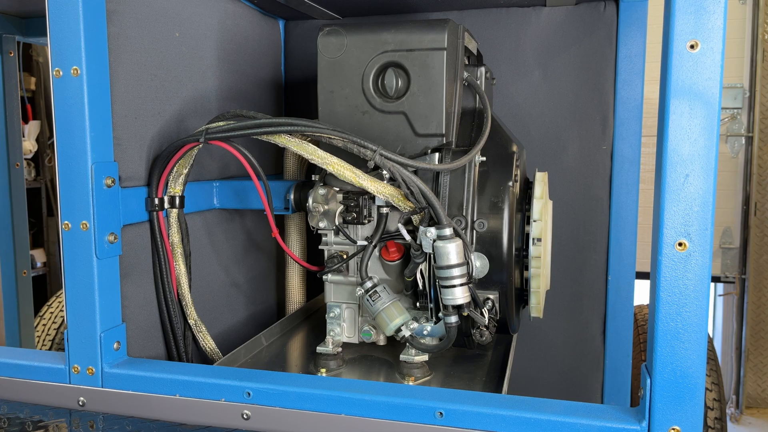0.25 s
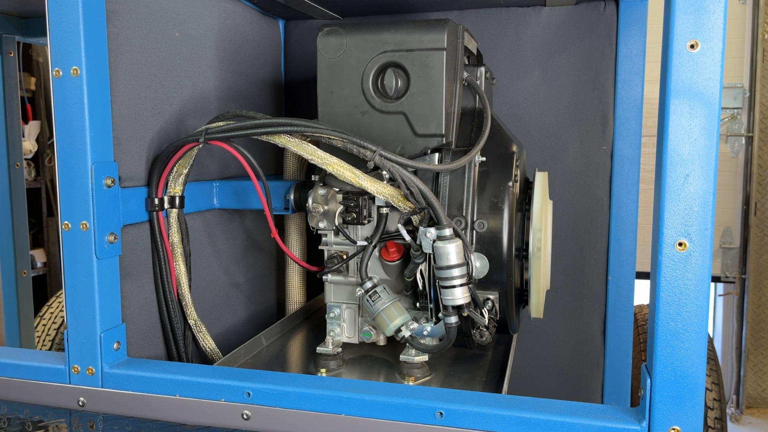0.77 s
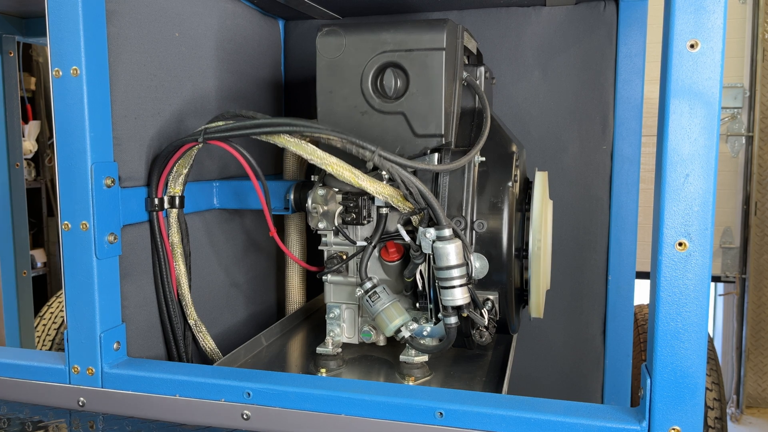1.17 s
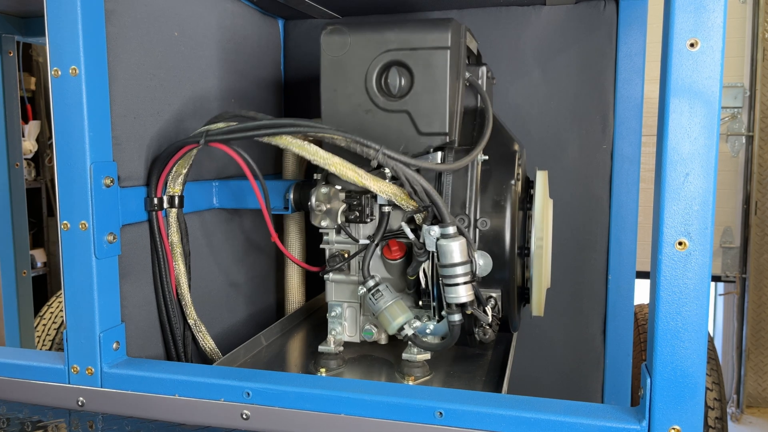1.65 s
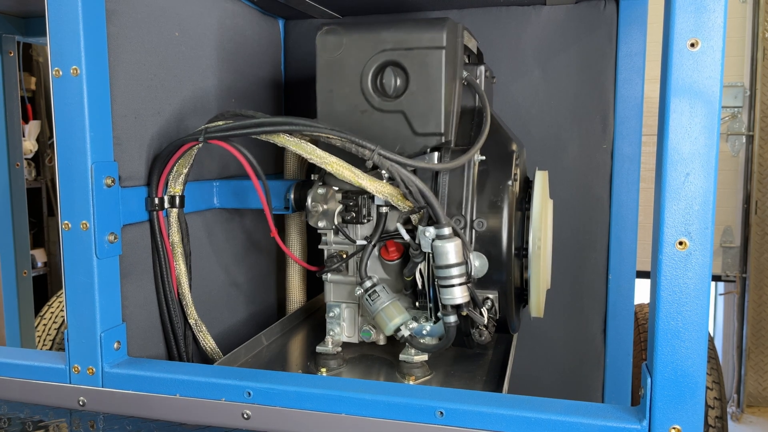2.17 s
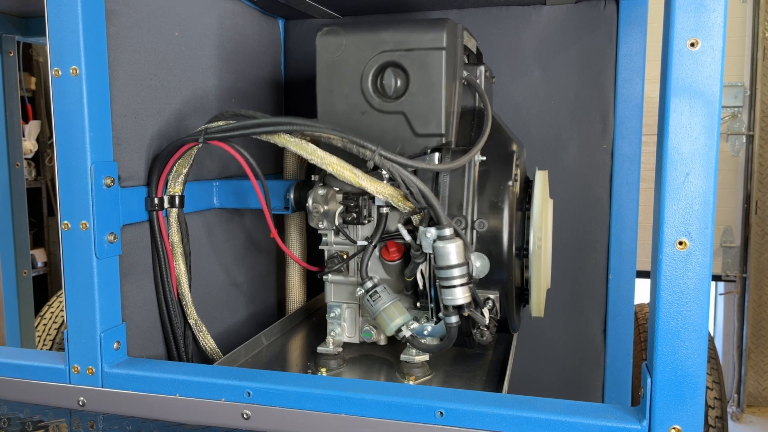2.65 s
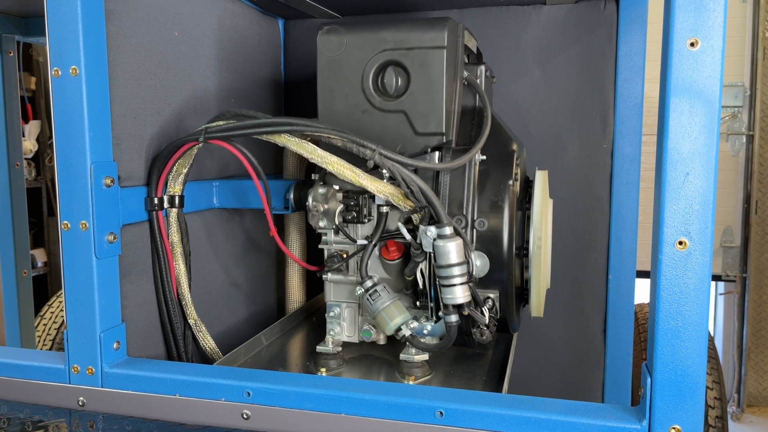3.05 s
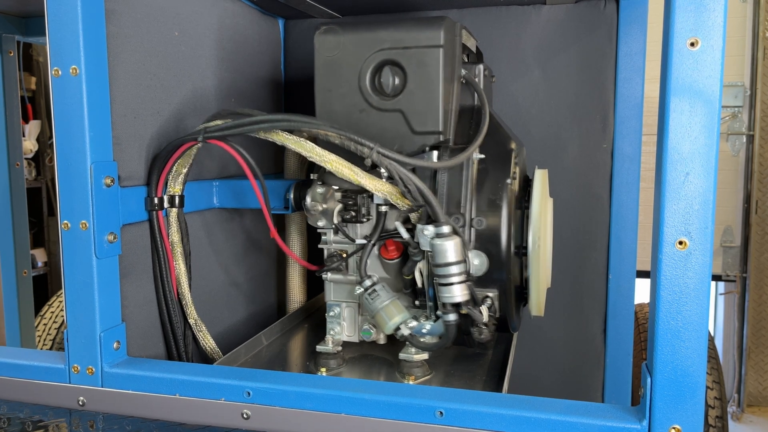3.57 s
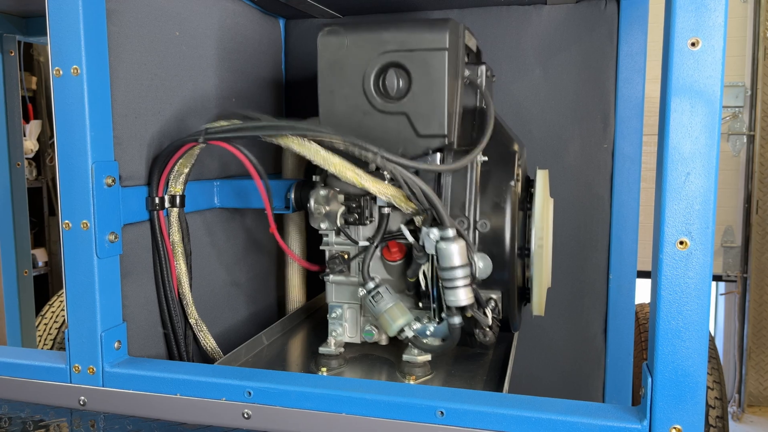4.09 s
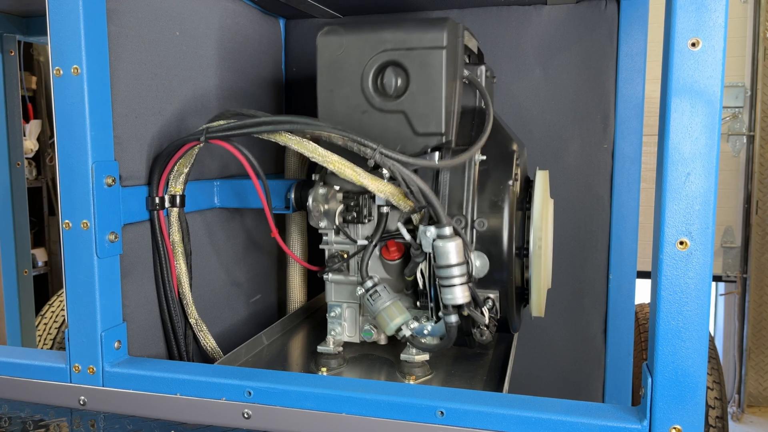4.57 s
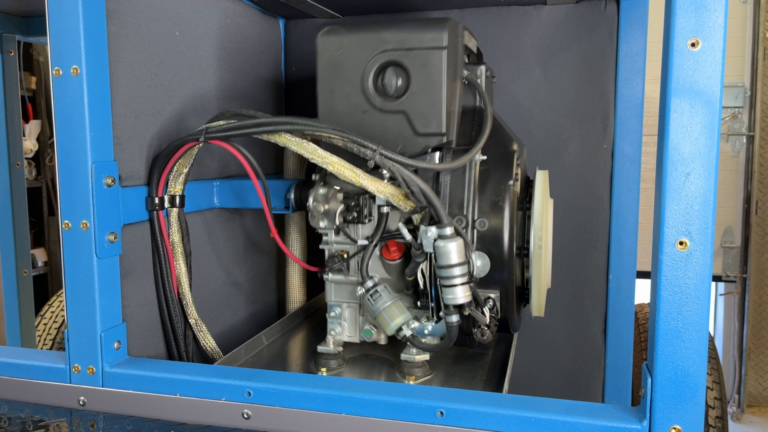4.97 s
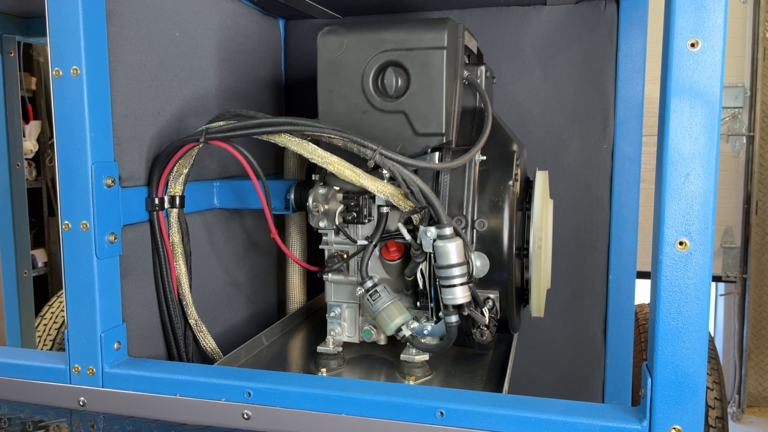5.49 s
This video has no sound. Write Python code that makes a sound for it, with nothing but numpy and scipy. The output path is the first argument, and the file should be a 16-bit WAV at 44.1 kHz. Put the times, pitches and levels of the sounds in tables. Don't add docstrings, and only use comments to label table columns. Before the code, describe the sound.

Close, dry stereo pickup of a small single-cylinder diesel in a metal frame, in a quiet yard. Near silence, then a metallic solenoid clack and a rising, labouring starter whine for about a second. Combustion catches with hard knocks, idles near ten per second with ticking valves, then suddenly knocks harder and accelerates into a steady low throb with mechanical clatter.

```python
import sys
import numpy as np
from scipy import signal
from scipy.fft import rfft, irfft, next_fast_len
from scipy.io import wavfile
from scipy.ndimage import uniform_filter1d

SR = 44100
rng = np.random.default_rng(int(sys.argv[2]) if len(sys.argv) > 2 else 0)


def amplitude_ratio(level_db):
    exponent = np.asarray(level_db, float) / 20
    return 10 ** exponent


def to_wav(sig):
    pcm = np.clip(np.atleast_2d(sig), -1, 1) * 32767
    pcm = np.round(pcm).astype(np.int16)
    wavfile.write(sys.argv[1], SR, pcm.T)


N = 253001
T = np.arange(N) / SR
IDLE_KNOCK_DB = -24

# t/s, level/dB
STARTER_EFFORT = [
    (0.61, -59),
    (0.635, -49),
    (0.7, -37),
    (0.93, -36.5),
    (1.01, -37),
    (1.27, -35.5),
    (1.38, -42.5),
    (1.485, -36.5),
    (1.56, -61),
]
# t/s, knock level/dB, brightness/dB
EARLY_FIRINGS = [(0.944, -25.5, -2), (1.238, -17.5, 6), (1.405, -18, -7), (1.54, -14.5, -4),
                 (1.65, -18.5, 2), (1.75, -17.5, 0), (1.846, -18.5, 1), (1.941, -24.5, 2),
                 (2.038, -26, 3.5), (2.138, -21.5, 2), (2.236, -22, 0), (2.335, -21.5, 1),
                 (2.439, -23.5, 3), (2.542, -22.5, 3), (2.649, -22.5, 0.5), (2.753, -22, 1.5),
                 (2.863, -22, 0), (2.974, -21.5, 1.5), (3.082, -21.5, -2), (3.192, -22, 1),
                 (3.304, -22, -1), (3.414, -23, 2), (3.5295, -13.5, 3), (3.63, -12.5, 2), (3.723, -13, 3.5),
                 (3.805, -14, 4.5), (3.883, -14, 7.5)]
# t/s, firing rate/Hz
RUN_UP_SPEED = [(3.883, 13.01), (4.2, 17.41), (4.5, 19.09), (4.8, 21.29), (5, 23.3), (5.25, 24.88),
                (5.75, 25.42)]
# f/Hz, level/dB, t60/s
HEAD_MODES = [(2745, -4, .035), (3350, 0, .04), (3700, -1, .03), (4190, -3, .028), (4726, -6, .03),
              (5756, -11, .025), (6400, -14, .02), (8300, -20, .015), (10600, -19, .015),
              (12500, -21, .015)]
# f/Hz, level/dB
CLATTER_SPECTRUM = [(200, 0.5), (400, 1.5), (700, -1), (1000, -1.5), (1500, -3), (2300, -3), (2900, -7.5),
                    (3500, -6), (5000, -12.5), (7000, -19), (9000, -21.5)]


def read(points, hz):
    f, value = np.transpose(points)
    return np.interp(np.log(hz + 1), np.log(f + 1), value)


def curves(rows):
    s, *columns = np.transpose(rows)
    return [np.interp(T, s, c) for c in columns]


def evened(x):
    return x / np.sqrt(np.mean(x ** 2) + 1e-20)


def filtered(x, hz, kind="bandpass"):
    return signal.lfilter(*signal.butter(2, hz, kind, fs=SR), x)


def zero_phase(x, order, hz, kind="lowpass"):
    return signal.sosfiltfilt(signal.butter(order, hz, kind, fs=SR, output="sos"), x)


def noise(points, patchy_db):
    a, b, patches = rng.standard_normal((N // 256 + 5, 513, 3)).T
    patches = uniform_filter1d(patches, size=8, axis=0)
    patches = evened(uniform_filter1d(patches, size=6, axis=1))
    level_db = read(points, np.fft.rfftfreq(1024, 1 / SR))[:, None]
    z = (a + 1j * b) * amplitude_ratio(level_db + patchy_db * patches)
    return evened(signal.istft(z, nperseg=1024, noverlap=768)[1][:N])


def resonate(x, hz, width):
    return signal.lfilter(*signal.iirpeak(hz, hz / abs(width), SR), x)


def ring(x, modes):
    t = T[:8192]
    body = 0
    for k, (hz, db, t60) in enumerate(modes):
        body = body + (-1) ** k * amplitude_ratio(db - 60 * t / t60) * np.sin(2 * np.pi * hz * t)
    return signal.oaconvolve(x, body / abs(body).max())[:N]


def blows(s, db, length, sharp):
    train = np.zeros(N)
    np.add.at(train, np.clip(np.round(s * SR).astype(int), 0, N - 1), amplitude_ratio(db))
    swell = T[:2000] * np.exp(-T[:2000] / length)
    rattle = signal.oaconvolve(train, swell / np.linalg.norm(swell))[:N]
    return sharp * train + rng.standard_normal(N) * rattle


def puffs(s, db, hz, length):
    train, t = np.zeros(N), T[:2401] - T[1200]
    train[np.minimum(s * SR, N - 1).astype(int)] = amplitude_ratio(db) * (s < T[-1])
    shape = -np.cos(2 * np.pi * hz * t) + .38 * np.sin(4 * np.pi * hz * t)
    return signal.oaconvolve(train, shape * np.exp(-(t / length) ** 4), "same")


def run_up():
    speed = curves(RUN_UP_SPEED)[0] * (T >= RUN_UP_SPEED[0][0])
    return speed, np.cumsum(speed) / SR


def firings():
    # t/s, peak level/dB, brightness/dB
    revved = [(3.953, -28, 9.5), (4.024, -23, 4), (4.088, -23.5, 6.5), (4.151, -19.5, 2), (4.21, -26, 5),
              (4.267, -25, 7), (4.322, -25.5, 7), (4.377, -24, 7), (4.431, -27, 10.5), (4.483, -26, 7.5),
              (4.536, -23, 0), (4.586, -24, 5), (4.637, -23, -4), (4.685, -24.5, 1), (4.735, -22, -1),
              (4.782, -29, 5), (4.83, -24, 2), (4.876, -19.5, -1), (4.92, -22.5, 2), (4.965, -23, 0),
              (5.008, -24, -4), (5.05, -24, -1), (5.09, -28.5, -9), (5.134, -26, -12), (5.175, -24.5, -10),
              (5.215, -37, 5)]
    turns = run_up()[1]
    at = T[np.flatnonzero(np.diff(np.floor(turns)))][len(revved):] + .0005
    settled_db = -41 + 1.2 * rng.standard_normal(len(at))
    settled = np.c_[at, settled_db, 0 * at]
    return np.r_[EARLY_FIRINGS, np.add(revved, [0, 1, 0]), settled].T


def crank(s):
    s = signal.savgol_filter(s, 7, 3)
    s = np.r_[2 * s[0] - s[1], s, 2 * s[-1] - s[-2], 3 * s[-1] - 2 * s[-2]]
    return np.interp(T, s, np.arange(len(s)) - 1.)


def when(cycle, place):
    return np.interp(np.arange(int(cycle[-1]) + 1) + place, cycle, T, right=T[-1] + 1)


def lobes(cycle, *humps):
    return amplitude_ratio(sum(db * np.exp(-(((cycle - at + .5) % 1 - .5) / width) ** 2) for at, width, db in humps))


def by_speed(cycle, rows):
    speed, *columns = np.transpose(rows)
    now = uniform_filter1d(np.gradient(cycle), size=5000, mode="nearest") * SR
    return [np.interp(now, speed, c) for c in columns]


def compressions(late, width):
    return sum(np.exp(-((T - s - late) / width) ** 2) for s, *_ in EARLY_FIRINGS[:3])


def yard():
    # t/s, level/dB
    ambient_level = [(0, -100), (.03, -103), (.1, -85), (.2, -77), (.35, -72.5), (.55, -67.5), (.7, -64)]
    # f/Hz, level/dB
    ambient_spectrum = [(30, -19), (70, -1), (125, 0), (190, -9), (260, -7), (400, -14), (700, -16),
                        (1500, -24), (3000, -33), (7000, -52), (12000, -58), (15400, -70)]
    # t/s, width/s, level/dB
    rustle = (.29, .05, -88)
    at, width, db = rustle
    leaves = noise([(2000, -20), (4000, 0), (13000, -4), (15000, -30)], patchy_db=2)
    ambient = amplitude_ratio(curves(ambient_level)[0]) * noise(ambient_spectrum, patchy_db=1.2)
    return ambient + amplitude_ratio(db) * np.exp(-abs(T - at) / width) * leaves


def opening_blip():
    return amplitude_ratio(-60) * (T < .0105) * noise(CLATTER_SPECTRUM, patchy_db=3)


def air_box(cycle):
    # place/cycle, idle level/dB, level at speed/dB
    box_blows = [
        (.04, 0, -8),
        (.5, 1, -5),
        (.82, -9, 0),
    ]
    # t/s, level/dB
    draw = [(.66, -55.5), (.93, -53), (1.07, -46), (1.2, -53), (1.32, -36), (1.45, -48), (1.6, -35),
            (1.7, -39.5), (1.9, -44.5), (2.45, -43.5), (2.9, -57.5), (3.45, -54.5), (3.57, -40.5),
            (3.85, -41), (4.2, -42.5), (4.85, -46), (5.1, -53.5), (5.7, -54)]
    at, db = [], []
    for place, *levels in box_blows:
        s = when(cycle, place)
        at.append(s)
        db.append(np.interp(s, [3.5, 4.2], levels))
    at, db = np.concatenate(at), np.concatenate(db)
    struck = blows(at, db + 1.5 * rng.standard_normal(len(at)), .0012, 1.5)
    flow = evened(rng.standard_normal(N) * lobes(cycle, (.07, .08, 7), (.53, .08, 7)))
    drive = evened(struck) + np.interp(T, [3.5, 4], [.6, .3]) * flow
    return amplitude_ratio(curves(draw)[0]) * evened(resonate(drive, 618, 25))


def gear_whine(speed, turns):
    # multiple of firing rate, level/dB
    orders = [(7, -46), (9, -53), (15, -55), (26, -55), (33, -53), (38, -47.5), (42, -47), (52, -55)]
    turns = turns - .07
    return sum(amplitude_ratio(db) * speed ** 2.5 * np.sin(2 * np.pi * k * turns) for k, db in orders)


def running(cycle):
    # firing rate/Hz, rumble/dB, clatter/dB, fan and leak hiss/dB
    running_levels = [(4.04, -57.5, -47.5, -98), (5.1, -51.5, -37.5, -71), (7.5, -41.5, -36.5, -74),
                      (9, -47, -43.5, -77), (10.45, -44.5, -39.5, -75.5), (13.8, -40.5, -36.5, -68.5),
                      (18.3, -36, -35.5, -67), (24.57, -36.5, -33.5, -67), (26.34, -57, -39.5, -79)]
    # f/Hz, level/dB
    rumble_spectrum = [(25, -58), (45, -52), (70, -5.5), (110, 9), (160, -11), (250, -10.5), (400, -15.5),
                       (600, -35), (900, -103)]
    # f/Hz, level/dB
    hiss_spectrum = [(3000, -31), (5000, -80), (7000, 35.5), (9000, 40.5), (11500, 17), (13500, -30.5),
                     (14800, -4), (15700, -35)]
    rumble_db, clatter_db, hiss_db = by_speed(cycle, running_levels)
    hard = (curves(EARLY_FIRINGS)[0] - IDLE_KNOCK_DB) * (T < RUN_UP_SPEED[0][0])
    hard = uniform_filter1d(hard, size=3000)
    spinning = T > STARTER_EFFORT[1][0]
    rumble_db = rumble_db + .18 * hard - 27 * (T < 1)
    clatter_db = clatter_db + .25 * hard - 32 * (T < STARTER_EFFORT[1][0])
    brush_db = curves(STARTER_EFFORT)[0] - 25
    leak = (amplitude_ratio(hiss_db) + amplitude_ratio(brush_db)) * spinning

    rumble = noise(rumble_spectrum, patchy_db=1) * evened(lobes(cycle, (.65, .15, 3), (.15, .15, 2.5)))
    clatter = noise(CLATTER_SPECTRUM, patchy_db=1.5) * evened(lobes(cycle, (.07, .07, 5), (.55, .12, 2)))
    hiss = noise(hiss_spectrum, patchy_db=1) * evened(lobes(cycle, (.03, .04, 5), (.55, .08, 3.5)))
    speed, turns = run_up()
    speed = uniform_filter1d(speed, size=9000, mode="nearest") / 25
    rumble = rumble - np.clip(1.6 * speed - .75, 0, .8) * zero_phase(rumble, 2, 190)

    body = amplitude_ratio(rumble_db + 4) * rumble + air_box(cycle) + amplitude_ratio(clatter_db - 4) * clatter
    onset = np.clip((T - .565) / .01, 0, 1)
    return (body + amplitude_ratio(17) * leak * hiss) * onset + gear_whine(speed, turns)


def rasp(start, end, edge, db):
    gate = np.clip((T - start) / edge, 0, 1) * np.clip((end - T) / edge + 1, 0, 1)
    grain = evened(uniform_filter1d(rng.standard_normal(N), size=60))
    grit = rng.standard_normal(N) * amplitude_ratio(4 * grain)
    return amplitude_ratio(db) * gate * evened(filtered(grit, [2200, 6500]))


def scrapes():
    # start t/s, end t/s, edge/s, level/dB
    drags = [
        (1.692, 1.715, .012, -44),
        (1.755, 1.785, .012, -47),
    ]
    return sum(rasp(*row) for row in drags)


def clacks():
    # t/s, level/dB, brightness/dB
    strikes = [(0.559, -57, -1), (0.562, -44, -22), (0.569, -28, -7.5), (0.574, -72, 11),
               (0.585, -28.5, -11), (0.587, -64, -5), (0.593, -66, 1), (0.6, -32, -20), (0.612, -32.5, -23),
               (0.639, -42, -27), (1.014, -33, 3.5), (1.499, -25.5, -7)]
    # t/s, level/dB, brightness/dB
    kick = (1.404, -33, 6)
    # f/Hz, level/dB, t60/s
    gear_modes = [(1100, -4, .05), (2260, -2, .08), (3360, 0, .16), (4200, -3, .05), (4720, -8, .08)]
    s, blow_db, bright_db = np.transpose([*strikes, kick])
    blow = blows(s, blow_db, .0015, .9)
    out = ring(blow, [(300, -4, .04), (617, 1, .13), (1400, -4, .03), (2260, -11, .03)])
    out += amplitude_ratio(19) * filtered(blows(s, blow_db, .004, .3), [110, 3000])
    bright = blows(s, blow_db + bright_db, .001, .29)
    out += ring(bright, HEAD_MODES) + amplitude_ratio(4.5) * ring(bright, gear_modes)
    return out + amplitude_ratio(19) * filtered(bright, 1500, "highpass")


def starter():
    # t/s, f/Hz, tooth tone share/dB
    mesh = [(.61, 320, -8), (.66, 403, -3), (.726, 480, 2), (.784, 597, 4), (.86, 714, 5), (.904, 770, 5),
            (.93, 785, 5), (1, 745, 0), (1.056, 795, 5), (1.11, 848, 5), (1.198, 920, 6), (1.22, 935, 5),
            (1.3, 900, -8), (1.42, 1130, -10)]
    housing_hz = [1100, 1340, 1420, 1960, 2260, 2750, 3360, 3600, 4140, 4720, 5750, 6140, 6900, 11400]
    # width/Hz, level/dB
    housing_shape = [(39.6, -10), (60.3, 19), (81, 6), (79, 7), (59.7, 17.5), (49.7, -5), (49, 17),
                     (88, 21), (90, -26), (49, 16), (35, 15.5), (59, 16), (400, -29), (2170, 16)]
    mesh_hz, tone_db = curves(mesh)
    wobble = .007 * evened(uniform_filter1d(rng.standard_normal(N), size=400))
    load = compressions(.016, .018)
    turns = np.cumsum(mesh_hz * (1 + wobble - .38 * load)) / SR
    wear = uniform_filter1d(rng.standard_normal((9, N // 100 + 1)), size=9)
    wear = wear.repeat(100, axis=1)[:, :N]
    teeth = 0
    for k, w in enumerate(wear, 1):
        high_loss_db = 9 * np.clip(k * mesh_hz / 1000 - 4.3, 0, 3)
        teeth = teeth + amplitude_ratio(3.5 * evened(w) - high_loss_db) * np.cos(2 * np.pi * k * turns)
    drive = amplitude_ratio(tone_db - 7) * evened(teeth) + rng.standard_normal(N)
    housing = 0
    for k, (hz, (width, db)) in enumerate(zip(housing_hz, housing_shape)):
        mode = resonate(drive, hz, 1.22 * width) / np.sqrt(width / 100)
        housing = housing + (-1) ** k * amplitude_ratio(db) * mode
    broad = filtered(drive + .7 * rng.standard_normal(N), [1150, 5500])
    groan = 1.7 * np.cos(2 * np.pi * turns) + .6 * np.cos(4 * np.pi * turns)
    groan = amplitude_ratio(tone_db - 13 - 7.5 + 8.5 * load) * groan
    whirr = evened(housing) + amplitude_ratio(-3) * evened(broad) + groan
    on = (T > STARTER_EFFORT[0][0]) & (T < STARTER_EFFORT[-1][0])
    effort_db = curves(STARTER_EFFORT)[0] + 4.5 * compressions(0, .032) - 4
    return amplitude_ratio(effort_db) * whirr * uniform_filter1d(on * 1., size=800)


def injector(cycle):
    # t/s, level/dB
    needle = [
        (3.8, -75),
        (4, -42),
        (4.35, -34),
        (4.5, -35),
        (4.65, -41),
        (4.95, -43),
        (5.1, -75),
    ]
    s = when(cycle, .29)
    tick = blows(s, np.interp(s, T, curves(needle)[0]), .0008, .6)
    return ring(tick, [(6200, -8, .01), (9300, -3, .012), (10100, 0, .012), (10900, -5, .01)])


def throb(cycle):
    # t/s, level/dB
    first_puffs = [
        (1.011, -33.5),
        (1.037, -40),
        (1.082, -40),
        (1.299, -33),
        (1.323, -42),
    ]
    # place/cycle, pipe delay/s, f/Hz, length/s
    pulses = [
        (.514, .012, 100, .008),
        (.782, .0133, 83, .009),
        (.3, .0105, 150, .005),
        (.76, .016, 55, .012),
    ]
    # firing rate/Hz, exhaust/dB, intake/dB, frame shake/dB, intake surge/dB
    breathing = [(4, -72, -72, -72, -72), (6.3, -50, -45, -50, -60), (7.5, -33, -35, -45, -55),
                 (10, -33, -35.5, -43.5, -54), (12.3, -36, -34, -42, -36), (16, -38, -33, -40, -30),
                 (19.3, -30, -31.5, -40, -30), (23.5, -30, -27.5, -39, -39), (25.3, -30.5, -28.5, -43, -40)]
    out = puffs(*np.transpose(first_puffs), 79, .013)
    for (place, delay, hz, length), db in zip(pulses, by_speed(cycle, breathing)):
        s = when(cycle, place) + delay
        out += puffs(s, np.interp(s, T, db) + .078 * rng.standard_normal(len(s)), hz, length)
    edge = zero_phase(out, 3, 125, "highpass")
    return out - by_speed(cycle, [(23, 0), (25, .55)])[0] * edge


def knocks(cycle, s, knock_db, bright_db):
    # f/Hz, level/dB, t60/s
    block_modes = [(770, -5, .03), (886, 3, .04), (1103, 1, .05), (1250, -4, .03), (1404, -3, .044),
                   (1674, -11, .06), (1975, -7, .049), (2268, -17, .04)]
    # f/Hz, level/dB, t60/s
    cover_modes = [(1404, -7, .05), (3300, 0, .013), (3650, -1, .012), (5700, -9, .01), (10500, -10, .008)]
    # place/cycle, tick level/dB, share on the block/dB
    valves = [
        (.4, -43, -30),
        (.51, -41.5, -6),
        (.7, -42.5, -30),
        (.85, -49, -30),
    ]
    harder_db = .56 * (knock_db - IDLE_KNOCK_DB)
    faster = 1 / np.gradient(s) - 10
    head_db = bright_db - 40.5 + harder_db + .099 * faster
    bite_db = 1.624 * knock_db + 1
    block = blows(s - .003, knock_db - 7, .0035, .05) + blows(s, bite_db, .002, 1.2)
    head = blows(s - .001, head_db, .0013, .3)
    snap = blows(s, -38.5 + harder_db + .55 * faster, .0006, .9)
    thwack = filtered(blows(s, knock_db, .0039, .1), [1300, 2500])
    cover = np.zeros(N)
    for place, tick_db, share_db in valves:
        at = when(cycle, place)
        warm_db = np.interp(at, [1.7, 2.3], [-7, 0])
        tick = blows(at, tick_db + warm_db + 1.5 * rng.standard_normal(len(at)), .0004, 1.5)
        cover = cover + tick
        block = block + amplitude_ratio(share_db) * tick
    chuff = filtered(blows(s - .001, bite_db, .0019, .31), [680, 2300])
    fizz = filtered(blows(s - .001, head_db, .0027, .045), [3000, 12000])
    block = filtered(ring(uniform_filter1d(block, size=9), block_modes), 650, "highpass")
    rung = block + ring(head, HEAD_MODES) + ring(cover, cover_modes)
    rung += ring(snap, [*cover_modes[1:3], (2016, -.6, .015)])
    return rung + amplitude_ratio(27) * chuff + amplitude_ratio(20.5) * fizz + amplitude_ratio(17) * thwack


def ports(x):
    # f/Hz, phase/rad
    lead = [(0, 0), (1380, -.1), (1640, .3), (1980, 0), (3450, .8), (4650, .5), (5430, -.8), (7000, -1.3),
            (7800, -3), (8800, -3.25), (11100, -5.6), (13000, -7.4), (14600, -9.3), (15300, -9.5)]
    # f/Hz, level/dB
    tilt = [(60, -0.5), (110, -0.5), (200, -0.5), (380, -0.5), (700, -3.0), (1290, -2.5), (2380, 0.0),
            (4400, 2.5), (8120, 0.5), (15000, 0.0)]
    # f/Hz, level/dB
    scatter_level = [(60, -30), (130, -23), (250, -10), (600, -8), (1200, -2.5), (2500, -9), (4500, -2),
                     (7000, -9), (7800, -20), (8800, -20), (9500, -10), (12000, -8)]
    hz, _, z = signal.stft(x, SR, nperseg=512)
    scatter = np.exp(2j * np.pi * rng.random((z.shape[1], len(hz), 2)).T) * np.sqrt(2)
    late = signal.istft(z * scatter * amplitude_ratio(read(scatter_level, hz))[:, None], SR, nperseg=512)[1]
    both = x + np.pad(late, ((0, 0), (260, 0)))[:, :N]
    size = next_fast_len(N + 999)
    hz, side = np.fft.rfftfreq(size, 1 / SR), np.array([[.5], [-.5]])
    pair = np.exp(1j * side * read(lead, hz)) * amplitude_ratio(side * read(tilt, hz))
    return irfft(rfft(both, size) * pair, size)[:, :N]


def scene():
    s, knock_db, bright_db = firings()
    cycle = crank(s)
    mix = yard() + running(cycle) + scrapes() + clacks() + starter()
    mix += injector(cycle) + throb(cycle) + knocks(cycle, s, knock_db, bright_db)
    return opening_blip() + ports(mix)


def top_cut(x):
    return signal.sosfilt(signal.butter(12, 15730, fs=SR, output="sos"), x)


def record(dry):
    cut = zero_phase(dry, 2, 38, "highpass")
    cut = zero_phase(cut, 6, 14300)
    return top_cut(cut)


dry = scene()
out = record(dry)
to_wav(out)
```